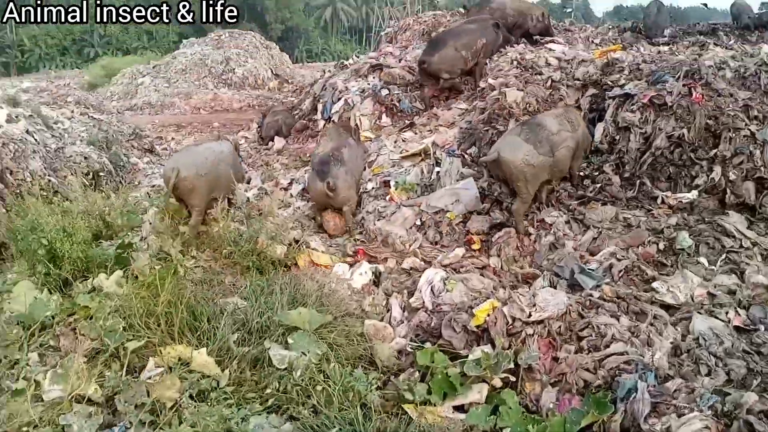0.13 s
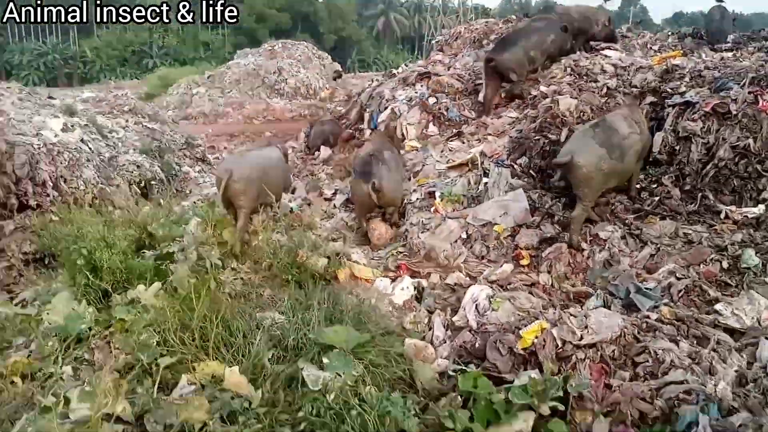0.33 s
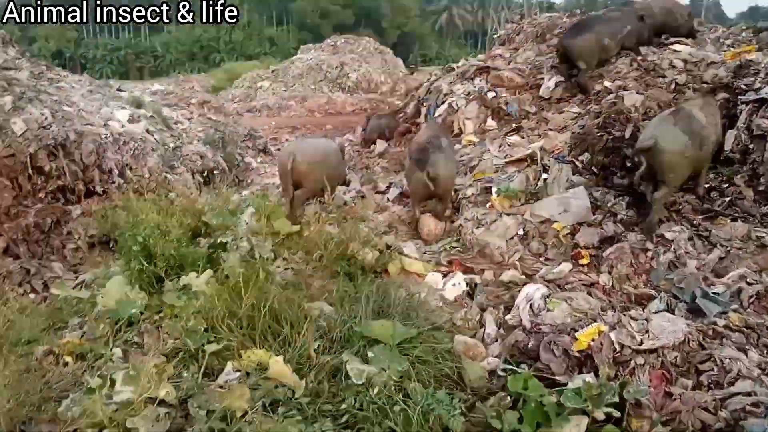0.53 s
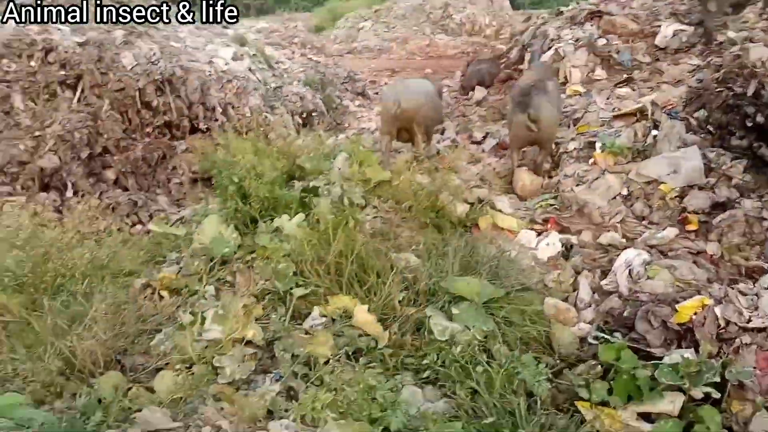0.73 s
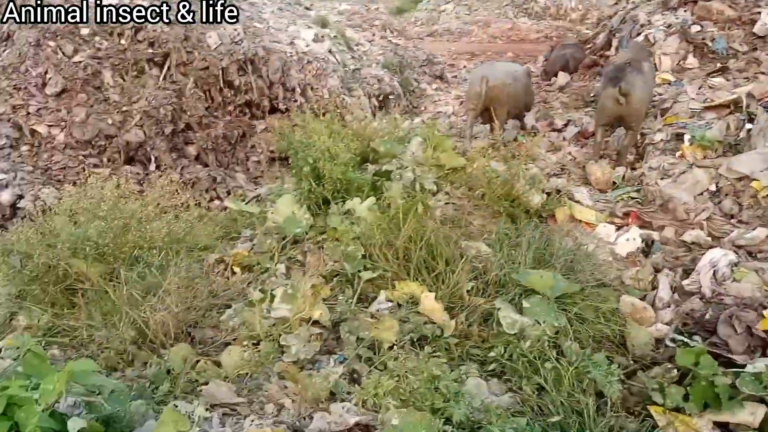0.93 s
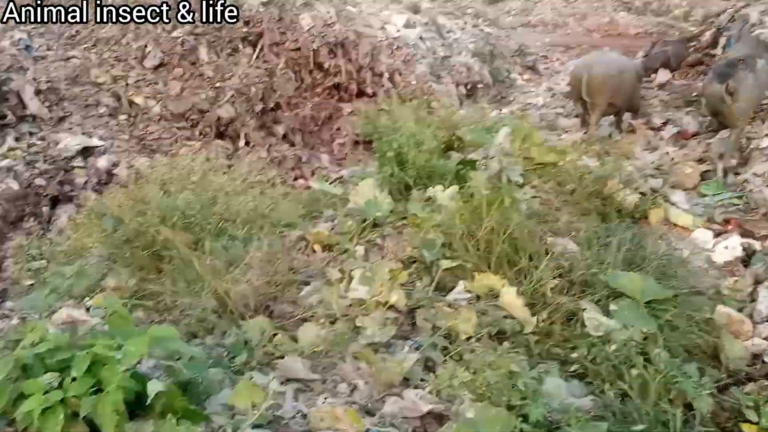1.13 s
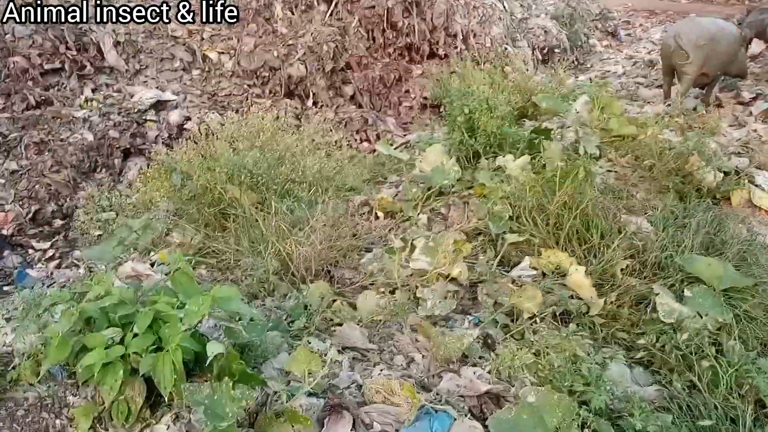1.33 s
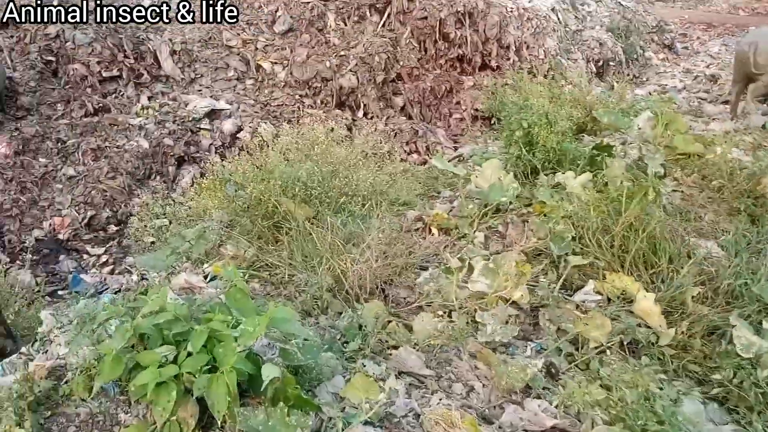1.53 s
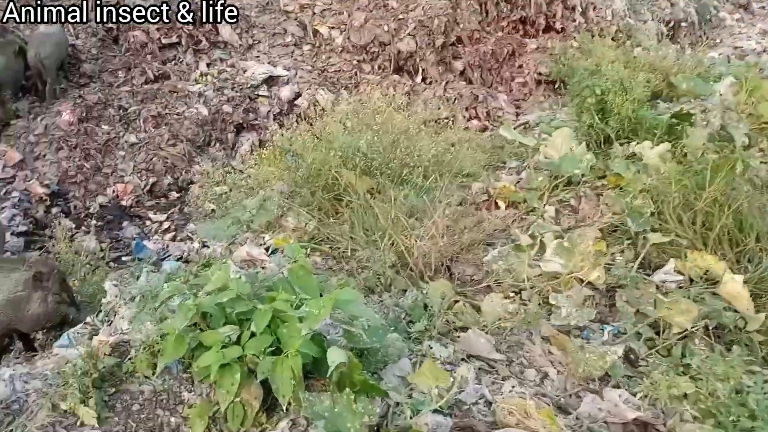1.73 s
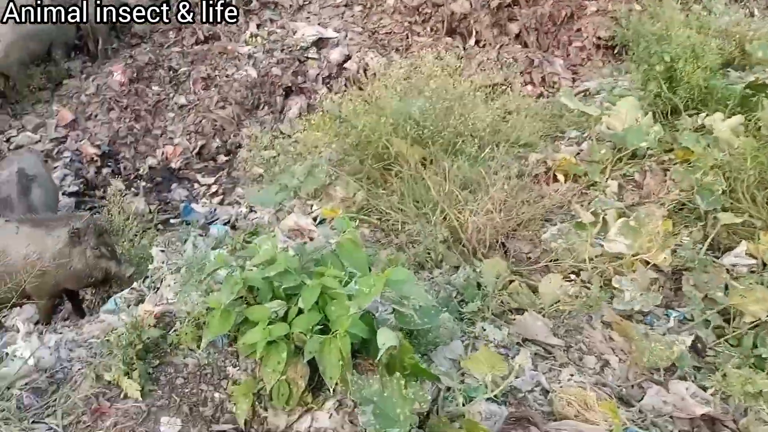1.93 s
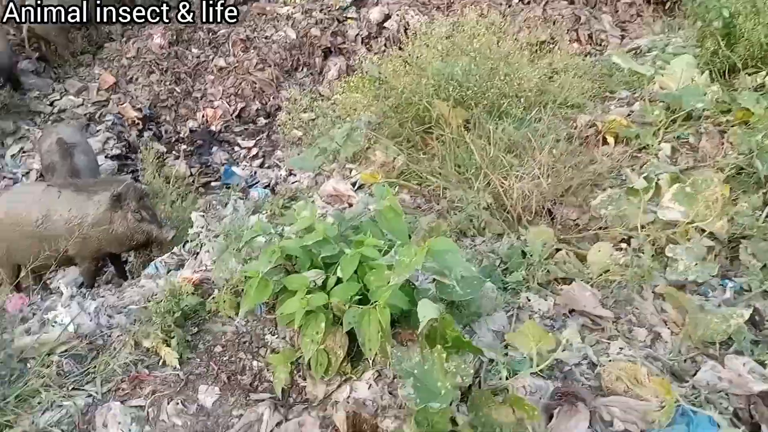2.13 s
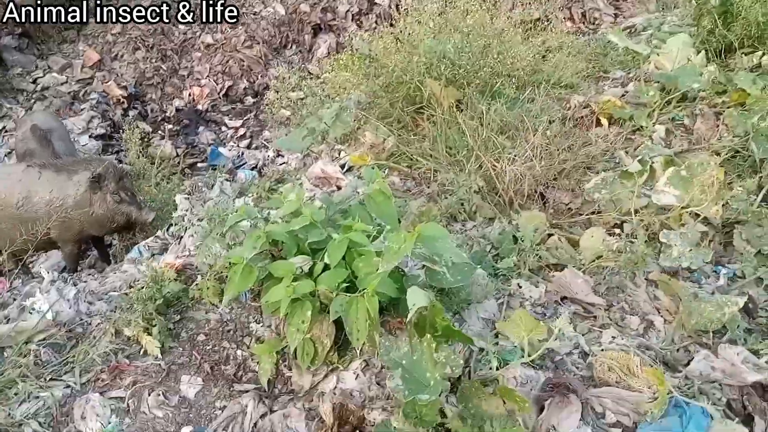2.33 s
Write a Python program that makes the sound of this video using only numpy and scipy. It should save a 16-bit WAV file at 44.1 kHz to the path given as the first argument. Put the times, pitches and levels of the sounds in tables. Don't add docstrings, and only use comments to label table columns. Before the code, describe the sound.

Many small birds chirp, whistle and twitter close by over a distant chorus, as pigs rustle plastic rubbish; one low grunt comes early, a crow caws later, with light wind rumble on an outdoor handheld microphone.

```python
import sys
import numpy as np
from scipy import signal
from scipy.fft import rfft, irfft
from scipy.io import wavfile
from scipy.ndimage import uniform_filter1d

SR = 44100
rng = np.random.default_rng(int(sys.argv[2]) if len(sys.argv) > 2 else 0)


def inscribe(sig):
    pcm = np.round(np.clip(np.atleast_2d(sig).T, -1, 1) * 32767)
    wavfile.write(sys.argv[1], SR, pcm.astype(np.int16))


def gain_from_decibels(decibels):
    exponent = np.asarray(decibels, float) / 20
    return 10 ** exponent


N = 104384


def evened(x):
    return x / np.sqrt(np.mean(x ** 2) + 1e-20)


def chance(count):
    return rng.standard_normal(SR * (count // SR + 1))[:count]


def drift(count, size):
    once = uniform_filter1d(chance(count + size), size)
    return evened(uniform_filter1d(once, size))[:count]


def read(points, hz):
    f, value = np.transpose(points)
    return np.interp(np.log(hz + 1), np.log(f + 1), value)


def colour(x, points):
    hz = np.fft.rfftfreq(len(x), 1 / SR)
    return irfft(rfft(x) * gain_from_decibels(read(points, hz)), len(x))


def resonate(x, hz, width):
    turn = np.exp(2j * np.pi * np.cumsum(hz * np.ones(len(x))) / SR)
    r = np.exp(-np.pi * width / SR)
    return 2 * (turn * signal.lfilter([1 - r], [1, -r], x / turn)).real


def follow(rows):
    s, *columns = np.transpose(rows)
    t = np.arange(s[0], s[-1], 1 / SR)
    return [np.interp(t, s, c) for c in columns]


def level(rows):
    return gain_from_decibels(np.interp(np.arange(N) / SR, *np.transpose(rows)))


def add(mix, s, sound):
    part = mix[max(round(s * SR), 0):][:len(sound)]
    part += sound[:len(part)]


def throb(count, per_s):
    rate = per_s * (1 + .15 * drift(count, size=300))
    return .5 + .5 * np.cos(2 * np.pi * np.cumsum(rate) / SR)


def sing(hz, db, flutter_db=2):
    octave_db, soft_s = -44, 0.0034
    a = 2 * np.pi * np.cumsum(hz) / SR
    n = np.arange(len(hz))
    ends = np.clip(np.minimum(n, n[::-1]) / (soft_s * SR), 0, 1)
    flutter = gain_from_decibels(flutter_db * drift(len(hz), size=130))
    wave = np.sin(a) + gain_from_decibels(octave_db) * np.sin(2 * a)
    return np.sqrt(2) * gain_from_decibels(db) * ends * flutter * wave


def fuzzy(hz, width, count):
    return evened(resonate(resonate(chance(count), hz, width), hz, width))


def chorus():
    # frequency in Hz, level in dB.
    chorus_spectrum = [(150, -41), (300, -10), (550, -8.5), (1330, -7.5), (3580, -1.5), (6520, -3),
                       (9000, -23.5), (13000, -53)]
    chorus_db, patchy_db = -32.5, 2.2
    frames, hz = N // 128 + 5, np.fft.rfftfreq(512, 1 / SR)
    a, b, patches = rng.standard_normal((frames, 257, 3)).T
    over_frequency = uniform_filter1d(patches, 5, 0)
    patches = evened(uniform_filter1d(over_frequency, 16, 1))
    z = (a + 1j * b) * gain_from_decibels(read(chorus_spectrum, hz)[:, None] + patchy_db * patches)
    return gain_from_decibels(chorus_db) * evened(signal.istft(z, nperseg=512, noverlap=384)[1][:N])


def rumble():
    # time in seconds, level in dB.
    gusts = [(0, -39), (.11, -46.5), (.15, -71), (.3, -56), (.38, -46), (.5, -55), (.68, -48.5),
             (.87, -43.5), (1.02, -54.5), (1.1, -43.5), (1.19, -64.5), (1.29, -39.5), (1.53, -45),
             (1.68, -53.5), (1.84, -38), (1.98, -43.5), (2.2, -62), (2.3, -44.5)]
    # frequency in Hz, level in dB.
    low_spectrum = [(30, -35), (62, 2.5), (110, 4), (170, -5), (300, -11.5), (600, -59)]
    low = colour(rng.standard_normal(N), low_spectrum)
    return level(gusts) * evened(low * gain_from_decibels(2.6 * drift(N, size=500)))


def rustle():
    # time in seconds, level in dB.
    effort = [(0, -58), (.06, -56.5), (.12, -69), (.2, -62.5), (.33, -61), (.42, -65), (.52, -60),
              (.62, -68.5), (.68, -54), (.96, -60), (1.02, -70), (1.1, -68), (1.35, -66.5), (1.41, -63),
              (1.6, -72), (2.37, -73)]
    # frequency in Hz, level in dB.
    litter_spectrum = [(300, -8), (1500, -6.5), (6500, -3), (9000, -8), (13300, -28.5), (14800, -17),
                       (15600, -18)]
    rustle_db, crackle_per_s, spread_db = 21.5, 3700, 3
    size = gain_from_decibels(spread_db * np.minimum(rng.exponential(1, N), 4)) * rng.standard_normal(N)
    crackle = size * (rng.random(N) < crackle_per_s / SR)
    grains = crackle + 0.61 * rng.standard_normal(N)
    clumped = grains * gain_from_decibels(3.66 * drift(N, size=700))
    return gain_from_decibels(rustle_db) * level(effort) * evened(colour(clumped, litter_spectrum))


def warble():
    length_s, centre_hz, swing_hz, warble_db = 0.13, 3240, 254, -28
    swings_per_s, top_s = 47.5, .085
    t = np.arange(0, length_s, 1 / SR)
    swing = np.cos(2 * np.pi * swings_per_s * (t - top_s))
    grown = np.minimum(t / 0.14, 1)
    hz = centre_hz - 250 * (1 - grown) + swing_hz * swing
    out = np.zeros(N)
    add(out, 0, sing(hz, warble_db + 3 * swing - 4 * (1 - grown)))
    return out


def short_notes():
    # start in seconds, length in seconds, first pitch in Hz, last pitch in Hz, level in dB.
    straight_notes = [(0, 0.041, 5680, 4000, -37.5), (0, .055, 4170, 3840, -40.5),
                      (.06, 0.016, 4100, 4200, -38), (.14, .012, 3050, 3250, -31),
                      (.175, .02, 2530, 2860, -39), (.39, 0.045, 3250, 3420, -40),
                      (.625, .03, 3920, 4600, -37.5), (.645, 0.036, 2250, 2210, -40),
                      (.725, 0.038, 4280, 4250, -38.5), (.755, 0.017, 3550, 3740, -37),
                      (.82, 0.011, 4500, 4300, -30), (.845, 0.019, 4120, 3030, -39.5),
                      (.95, 0.069, 2600, 2577, -43.5), (1.345, .028, 3800, 4070, -40.5),
                      (1.59, 0.012, 4010, 3900, -30), (1.633, .024, 4170, 5800, -31),
                      (1.64, 0.03, 3470, 3440, -37.5), (1.661, 0.016, 4020, 5100, -31.5),
                      (1.785, 0.014, 4360, 4470, -33), (1.845, .055, 1830, 1580, -42),
                      (1.845, 0.081, 4020, 3920, -44), (0, 0.082, 2820, 2384, -34),
                      (.1, 0.096, 2240, 2300, -41), (.2, 0.04, 2680, 2740, -36),
                      (.23, 0.04, 4400, 4600, -31), (.23, 0.048, 3300, 3100, -39.5),
                      (.245, 0.023, 4300, 3730, -45), (.52, 0.11, 1605, 1670, -45),
                      (.728, 0.016, 4900, 5540, -28.5), (.765, 0.075, 2610, 2745, -39),
                      (.81, 0.019, 3130, 2750, -33), (.85, 0.056, 2720, 2580, -37),
                      (.905, 0.016, 4030, 2900, -37), (1.305, 0.034, 2950, 2960, -35),
                      (1.335, 0.015, 3140, 2690, -31.5), (1.353, 0.045, 3170, 2920, -32),
                      (1.4, 0.042, 2320, 2440, -39), (1.785, 0.055, 3540, 3540, -42.5),
                      (2.08, 0.053, 3470, 3790, -38.5), (2.19, 0.068, 3170, 3316, -38),
                      (2.255, 0.096, 3696, 3520, -35.5)]
    out = np.zeros(N)
    for s, length, from_hz, to_hz, db in straight_notes:
        u = np.arange(0, length, 1 / SR) / length
        add(out, s, sing(from_hz + (to_hz - from_hz) * u, db, flutter_db=4.5))
    return out


def hits():
    # start in seconds, peak level in dB.
    snaps = [(0.0312, -23.5), (0.6687, -30), (.7128, -29), (0.7992, -23), (0.867, -28), (1.294, -28),
             (1.5254, -29), (1.99, -28), (0.099, -17.5), (0.507, -19), (0.5134, -15.5), (1.0645, -25),
             (1.0824, -20), (1.4004, -23), (1.919, -20), (1.942, -22), (2.0081, -16), (2.019, -16.5),
             (2.0335, -11.5), (2.0867, -22), (2.1161, -24), (2.171, -15.5)]
    # start in seconds, peak level in dB, ring pitch in Hz.
    knocks = [
        (0.373, -25.5, 1670),
        (0.6395, -25, 1500),
        (0.6551, -28, 1170),
        (0.8138, -29.5, 1210),
        (1.291, -23, 2130),
        (1.4792, -21, 1540),
        (1.8028, -25, 2130),
        (1.937, -24.5, 2090),
        (2.025, -18, 1990),
        (2.2364, -24, 2360),
    ]
    # start s, peak dB, ring Hz, width Hz, 60 dB decay s
    rows = [(s, db, 6280, 2300, 0.011) for s, db in snaps]
    rows += [(s, db, hz, 0.41 * hz, 0.038) for s, db, hz in knocks]
    out, t = np.zeros(N), np.arange(2000) / SR
    for s, db, hz, width, t60 in rows:
        ring = rng.standard_normal(len(t)) * gain_from_decibels(-60 * t / t60) * np.minimum(t / 0.0016, 1)
        for _ in range(3):
            ring = resonate(ring, hz, width)
        add(out, s, gain_from_decibels(db) * ring / abs(ring).max())
    return out


def hooked_notes():
    # start in seconds, length in seconds, top pitch in Hz, level in dB, fall time in seconds.
    hooks = [
        (.148, .051, 6120, -31, .012),
        (.27, .056, 6090, -27, .0035),
        (.4, .045, 6150, -29, .013),
    ]
    rise_s, dip_hz, fall_hz = .004, 1600, 2500
    out = np.zeros(N)
    for s, length, top_hz, db, fall_s in hooks:
        t = np.arange(0, length, 1 / SR)
        rise = np.exp(-t / rise_s)
        fall = np.exp((t - length) / fall_s)
        add(out, s, sing(top_hz - dip_hz * rise - fall_hz * fall, db - 6 * fall))
    return out


def blurs():
    # start in seconds, length in seconds, centre in Hz, width in Hz, level in dB.
    hoarse_calls = [(0.201, 0.024, 4150, 1200, -35), (0.292, 0.034, 3650, 500, -30.5),
                    (0.313, 0.03, 5340, 1500, -32), (0.334, 0.032, 4200, 700, -29.5),
                    (0.546, 0.052, 4600, 1500, -36), (0.653, 0.067, 6700, 500, -39.5),
                    (.69, .03, 5100, 500, -33), (0.948, 0.024, 4100, 690, -36),
                    (1.061, 0.068, 6380, 500, -34.5), (1.099, 0.029, 5000, 900, -31.5),
                    (1.148, 0.04, 5800, 700, -32.5), (1.266, 0.057, 5880, 500, -32.5),
                    (1.28, 0.06, 3700, 900, -32.5), (1.446, 0.034, 5460, 600, -34),
                    (1.478, 0.039, 6140, 600, -29), (1.505, .085, 3540, 600, -32.5),
                    (1.547, 0.05, 6000, 500, -30.5), (1.548, 0.046, 2460, 700, -34.5),
                    (2.024, 0.048, 3400, 700, -34), (2.1, 0.041, 5800, 900, -29.5)]
    out = np.zeros(N)
    for s, length, hz, width, db in hoarse_calls:
        count = round(length * SR)
        swell = np.sqrt(np.hanning(count))
        beats = 0.33 + throb(count, per_s=110)
        add(out, s, 1.18 * gain_from_decibels(db) * swell * beats * fuzzy(hz, width, count))
    return out


def whistles():
    # time in seconds, pitch in Hz, level in dB.
    falling = [(.35, 4300, -36), (.372, 5120, -32), (.4, 4650, -34), (.45, 3900, -36), (.51, 3550, -33),
               (.54, 3450, -38)]
    # time in seconds, pitch in Hz, level in dB.
    climbing = [(.78, 4000, -47), (.812, 5280, -24), (0.838, 5400, -31)]
    # time in seconds, pitch in Hz, level in dB.
    arched = [(.91, 4600, -36), (.955, 5330, -33), (.985, 5680, -36), (1.02, 5150, -35), (1.06, 4250, -37),
              (1.1, 3420, -30), (1.135, 2950, -40)]
    out = np.zeros(N)
    for rows in (falling, climbing, arched):
        add(out, rows[0][0], sing(*follow(rows)))
    return out


def grunt():
    # time in seconds, pulse rate in Hz, level in dB.
    pulse_curve = [
        (0.602, 50, -43.5),
        (0.658, 61.88, -33.5),
        (0.728, 58.34, -36.5),
        (0.803, 54.1, -40),
        (0.872, 49.4, -53),
    ]
    # frequency in Hz, width in Hz, level in dB.
    snout = [(138, 102, -1), (335, 73, -4), (582, 172, 0), (1140, 79, -3.5)]
    arch, rough = .12, .45
    hz, db = follow(pulse_curve)
    turns = np.cumsum(hz * (1 + 0.2012 * drift(len(hz), size=500))) / SR
    pulses = np.diff(np.floor(turns), prepend=0)
    puffs = np.exp(-(turns % 1) / 0.48) * chance(len(hz))
    drive = (1 - rough) * evened(pulses) + rough * evened(puffs)
    opening = 1 + arch * (gain_from_decibels(db - db.max()) - .6)
    voice = np.zeros(len(hz))
    for f, width, gain_db in snout:
        ring = resonate(resonate(drive, f * opening, width), f * opening, width)
        voice += gain_from_decibels(gain_db) * evened(ring)
    out = np.zeros(N)
    add(out, pulse_curve[0][0], gain_from_decibels(db) * evened(voice))
    return out


def hoarse_cries():
    # time in seconds, pitch in Hz, level in dB.
    rattle = [(.62, 3500, -40), (.655, 3650, -33), (.685, 3720, -30), (.705, 3800, -34), (.725, 3050, -35),
              (.75, 3100, -40)]
    # time in seconds, pitch in Hz, level in dB.
    screech = [(1.39, 3050, -40), (1.44, 3450, -35), (1.475, 3650, -30), (1.5, 4400, -30),
               (1.54, 4620, -26), (1.572, 4450, -27), (1.585, 4350, -36)]
    out = np.zeros(N)
    for rows, beats_per_s in ((rattle, 125), (screech, 200)):
        hz, db = follow(rows)
        fuzz = fuzzy(hz, 480, len(hz))
        beats = 0.71 + 1.09 * throb(len(hz), beats_per_s) ** 2
        add(out, rows[0][0], beats * (.5 * sing(hz, db) + gain_from_decibels(db) * fuzz))
    return out


def chirps():
    # start in seconds, length in seconds, first pitch in Hz, last pitch in Hz, level in dB.
    swept_chirps = [
        (.825, 0.022, 3300, 4300, -34),
        (1.528, 0.0176, 6070, 7130, -27.5),
        (1.55, 0.014, 4300, 6940, -22.5),
        (1.574, 0.025, 4360, 6600, -22),
        (1.603, 0.022, 3690, 6140, -22),
        (1.606, .06, 3600, 2490, -35.5),
        (1.678, 0.038, 4090, 3480, -34),
    ]
    bend, fade_db = .4, -7
    out = np.zeros(N)
    for s, length, from_hz, to_hz, db in swept_chirps:
        u = np.arange(0, length, 1 / SR) / length
        add(out, s, sing(from_hz + (to_hz - from_hz) * u ** bend, db + fade_db * u))
    return out


def crow():
    # start in seconds, length in seconds, pitch in Hz, level in dB, roughness from 0 to 1.
    caws = [
        (1.645, .225, 231, -33.5, .02),
        (2.28, .16, 214, -35, .22),
    ]
    # harmonic number, level in dB.
    harmonics = [(5, -9), (7, -4), (9, 0), (11, -14)]
    rasp_per_s, rasp_depth, sag, shake = 120, .7, .1, .1
    out = np.zeros(N)
    for s, length, hz, db, rough in caws:
        u = np.arange(0, length, 1 / SR) / length
        rasp = throb(len(u), rasp_per_s)
        shape = .96 + 0.035 * np.sin(np.pi * u ** 0.625) - sag * u ** 6 + shake * (rasp - .5)
        a = 2 * np.pi * np.cumsum(hz * (shape + rough * drift(len(u), size=60))) / SR
        voice = sum(gain_from_decibels(d) * np.sin(round(k) * a) for k, d in harmonics)
        ends = np.minimum(20 * u, 1) * (1 - u ** 10)
        add(out, s, gain_from_decibels(db) * ends * evened(voice * (1 - rasp_depth * rasp)))
    return out


def scattered(x):
    echo_db, echo_t60 = -10.5, 0.16
    t = np.arange(SR // 4) / SR
    tail = rng.standard_normal(len(t)) * gain_from_decibels(-60 * t / echo_t60) * (t > .004)
    return x + gain_from_decibels(echo_db) * signal.fftconvolve(x, tail / np.linalg.norm(tail))[:N]


def scene():
    near_birds = warble() + short_notes() + hooked_notes() + whistles() + hoarse_cries() + chirps()
    heap = rustle() + hits()
    return (scattered(near_birds) + blurs() + chorus() + rumble() + heap + grunt() + crow())[None]


def roll_off(x):
    return signal.sosfilt(signal.butter(12, 16550, fs=SR, output="sos"), x)


def record(dry):
    low_edge_hz, top_edge_hz = 55, 15650
    hz = np.fft.rfftfreq(N, 1 / SR)
    bass = hz ** 2 / np.hypot(hz ** 2, low_edge_hz ** 2)
    finished = irfft(rfft(dry) * (hz < top_edge_hz) * bass, N)
    return roll_off(finished)


dry = scene()
out = record(dry)
inscribe(out)
```